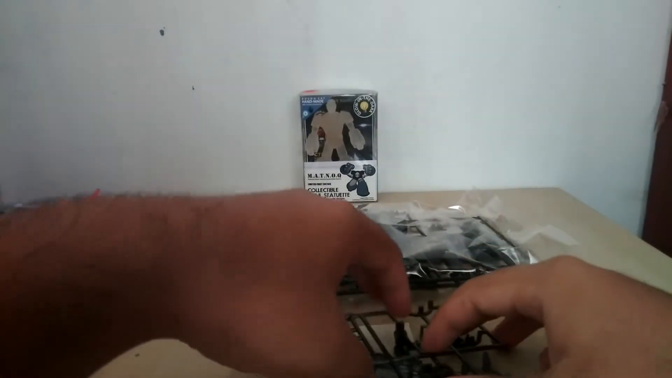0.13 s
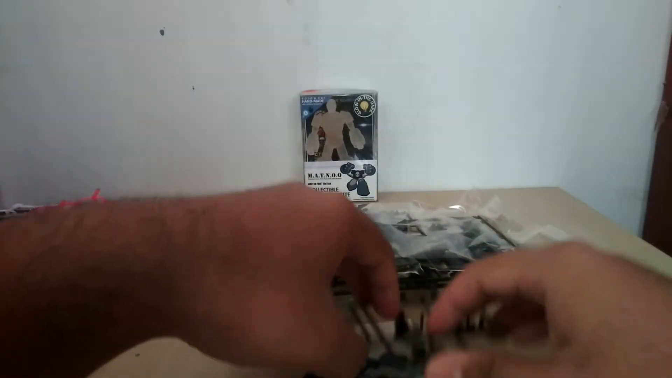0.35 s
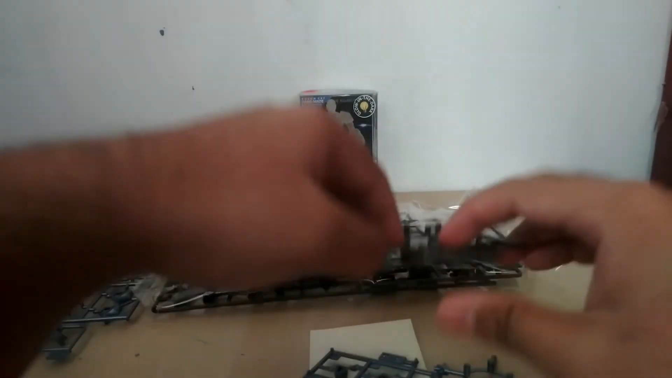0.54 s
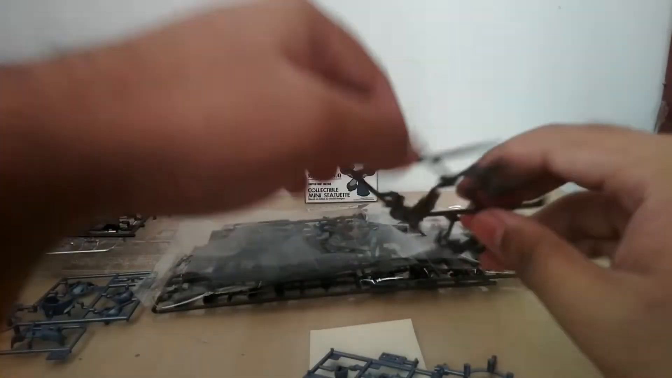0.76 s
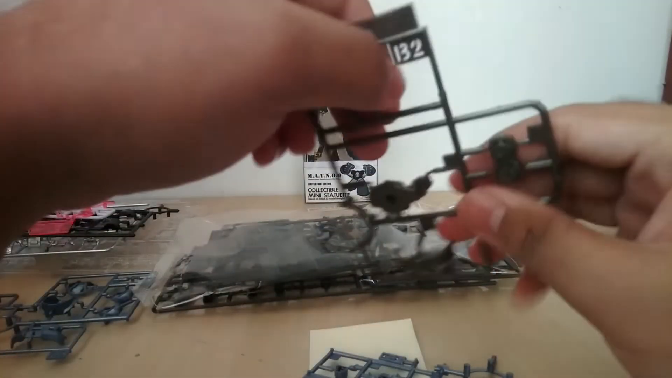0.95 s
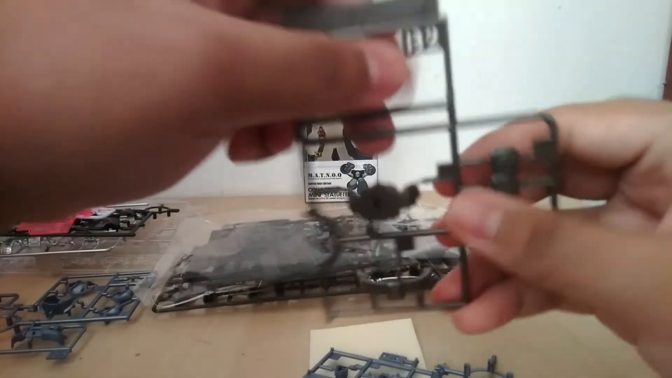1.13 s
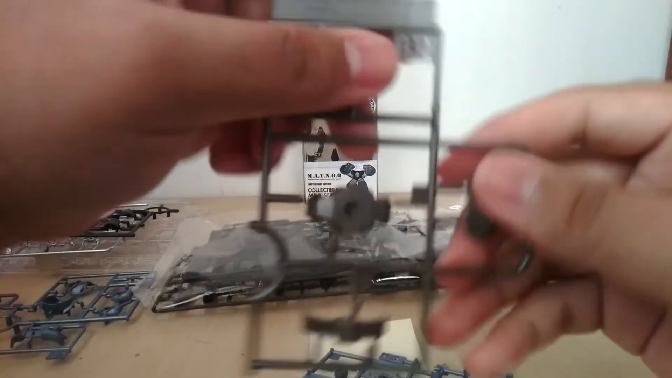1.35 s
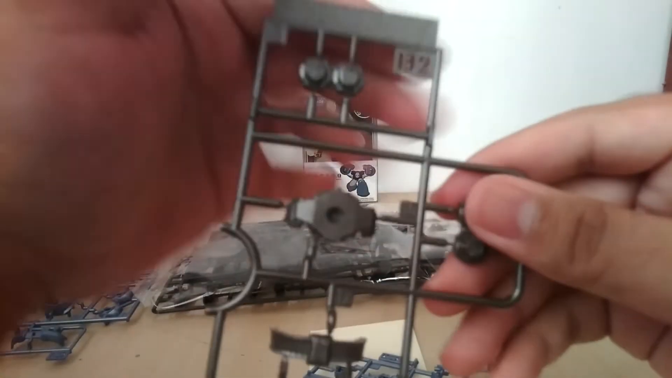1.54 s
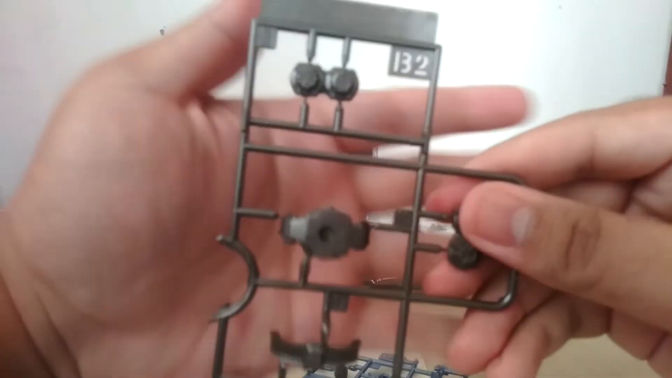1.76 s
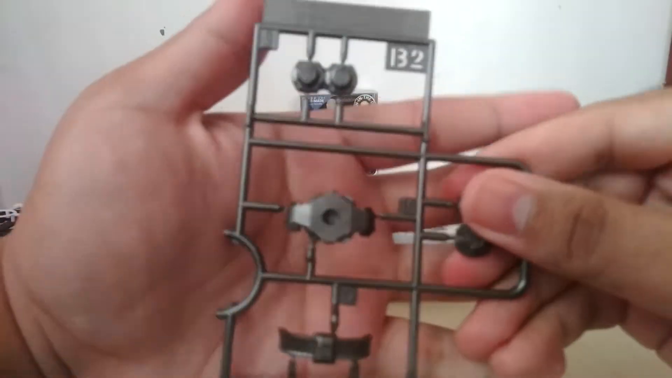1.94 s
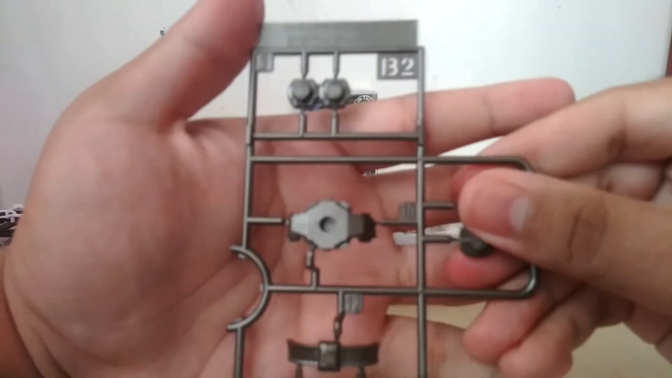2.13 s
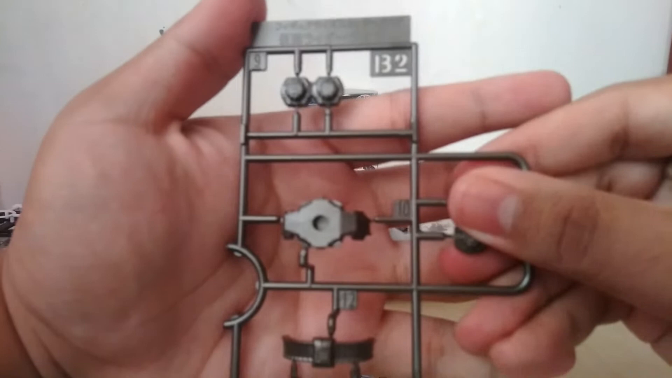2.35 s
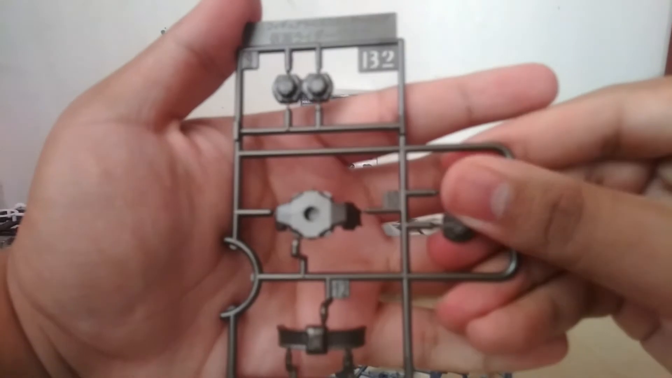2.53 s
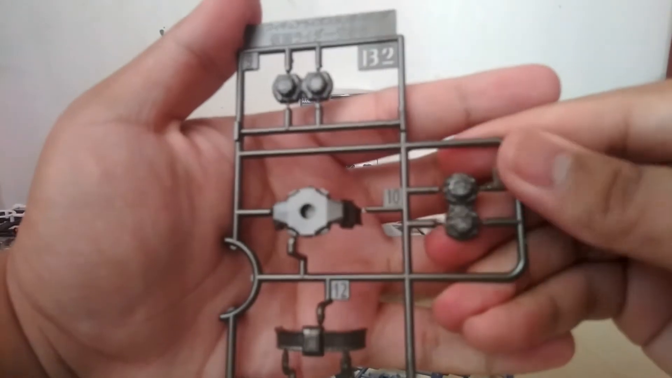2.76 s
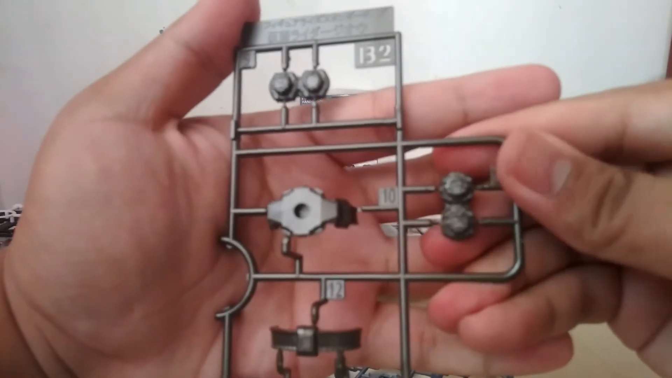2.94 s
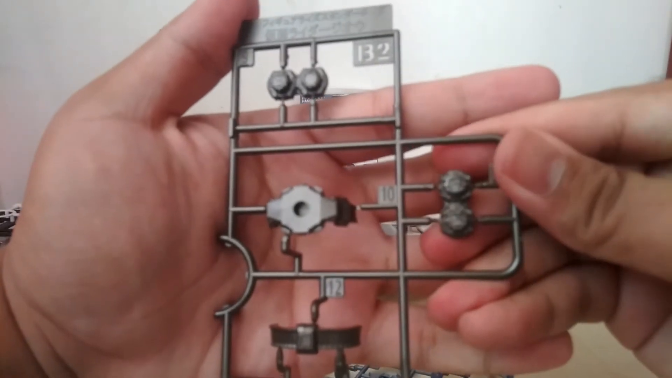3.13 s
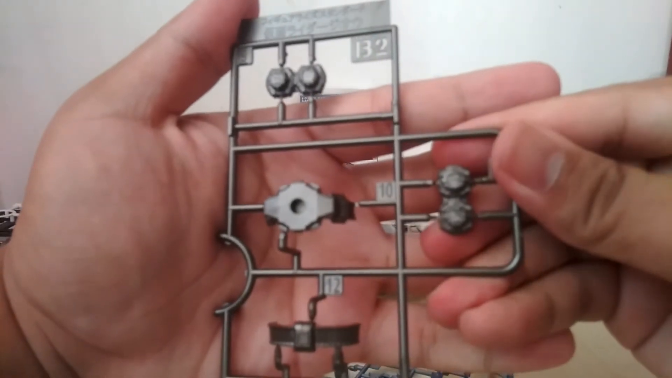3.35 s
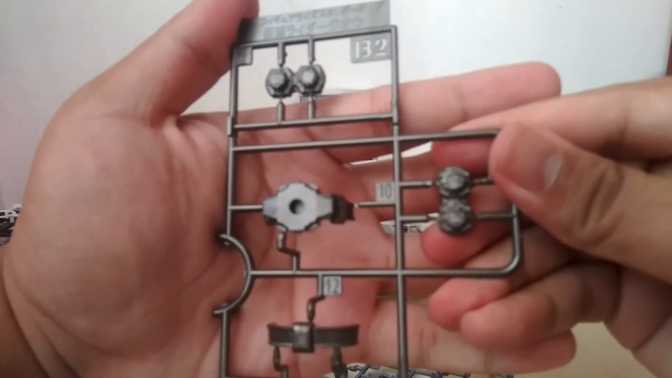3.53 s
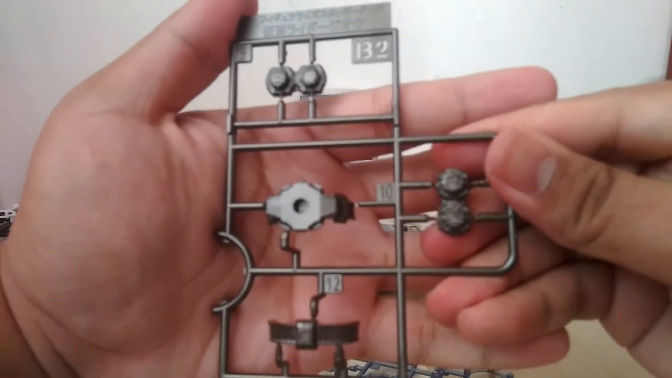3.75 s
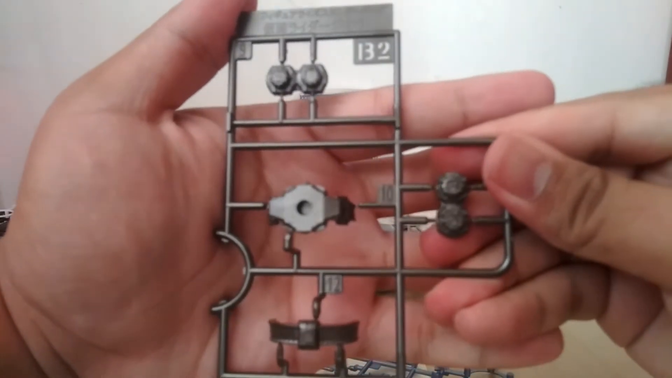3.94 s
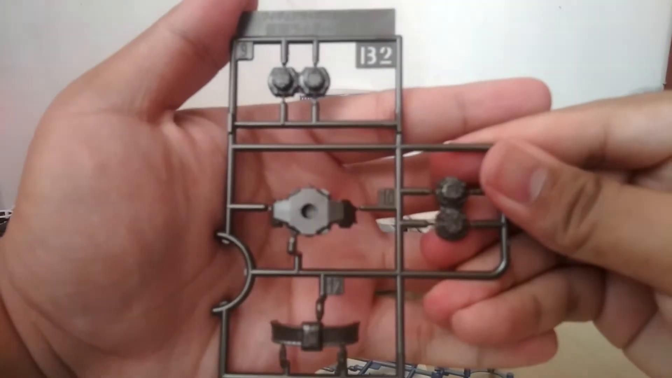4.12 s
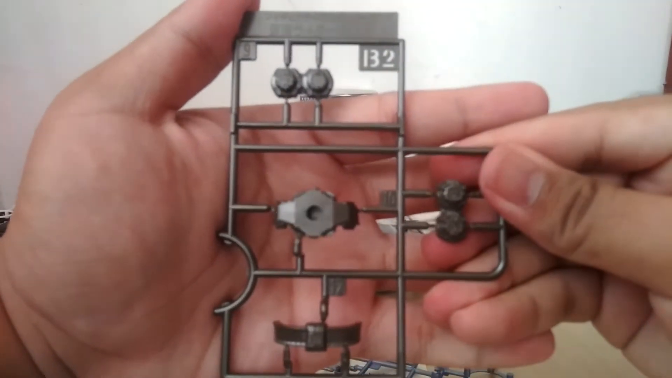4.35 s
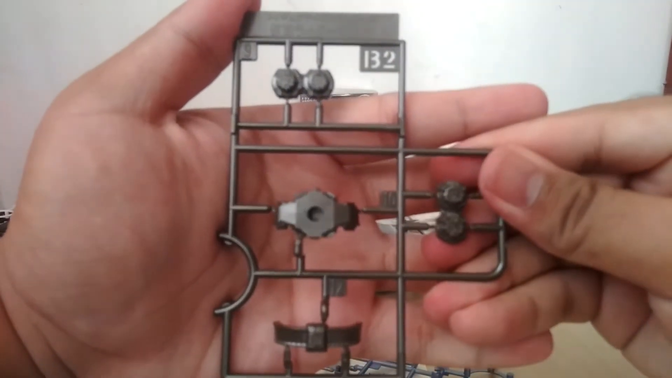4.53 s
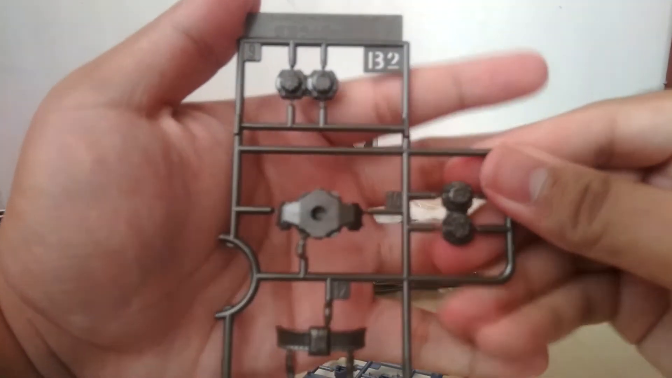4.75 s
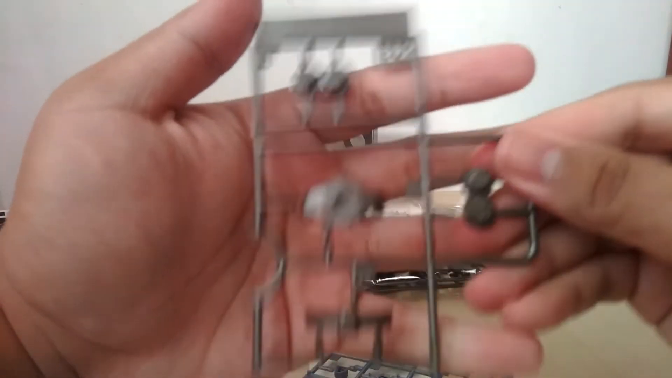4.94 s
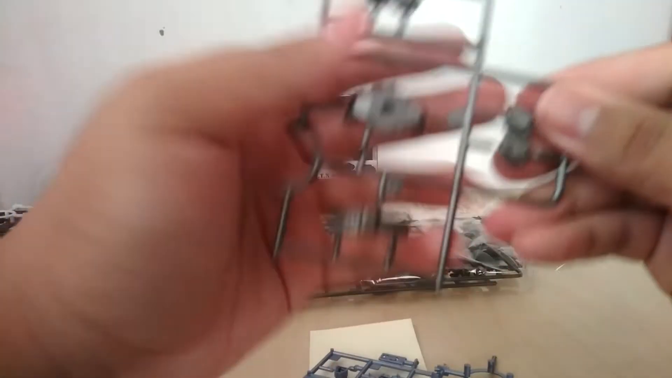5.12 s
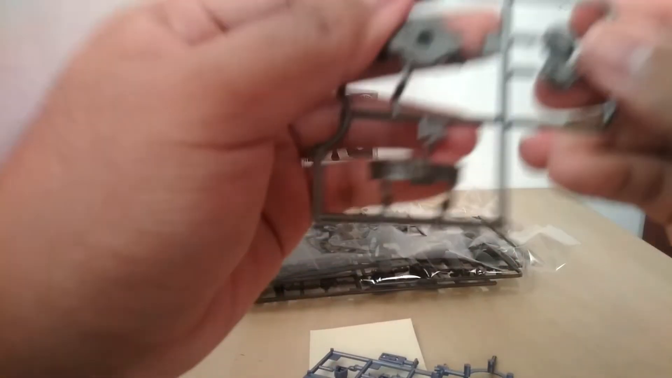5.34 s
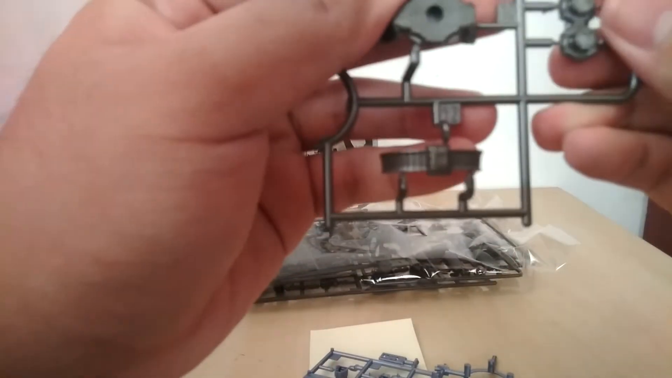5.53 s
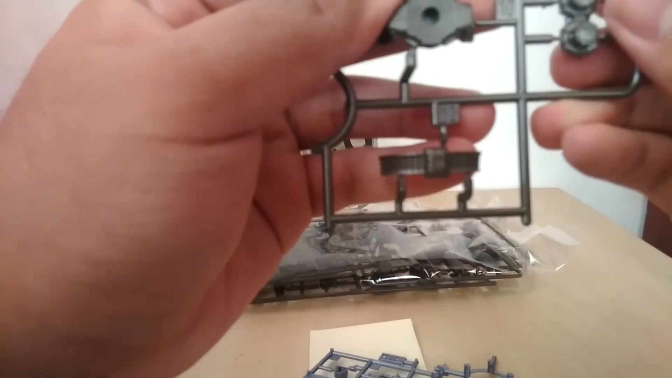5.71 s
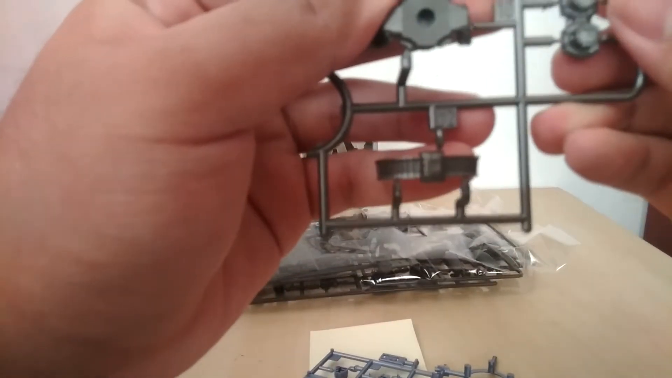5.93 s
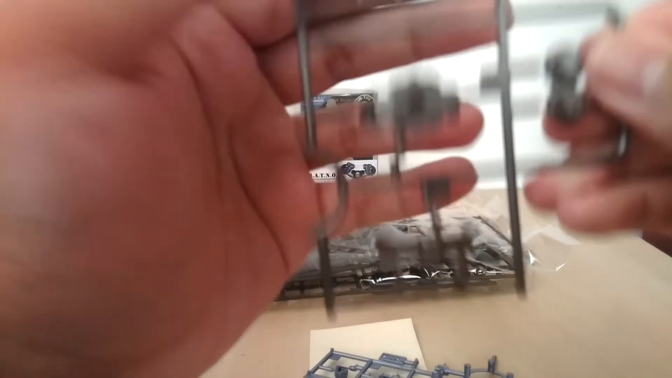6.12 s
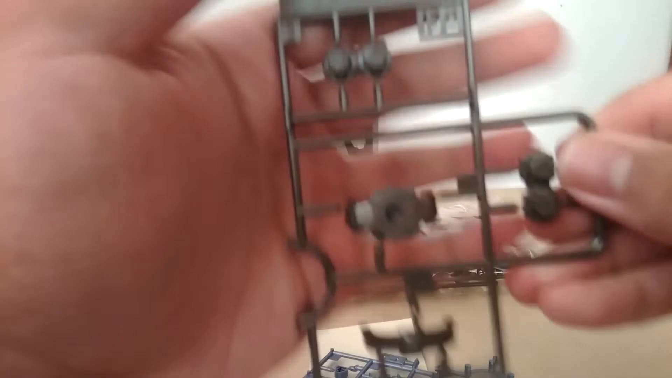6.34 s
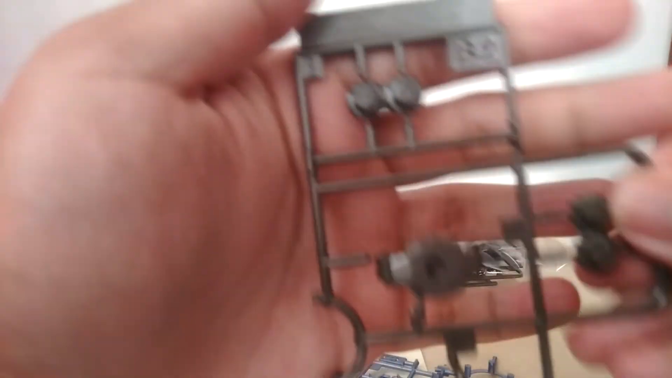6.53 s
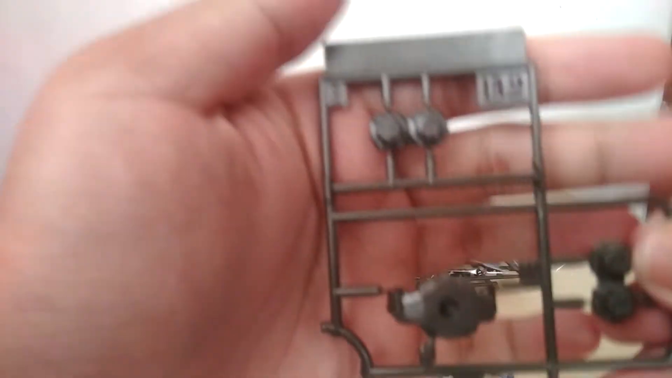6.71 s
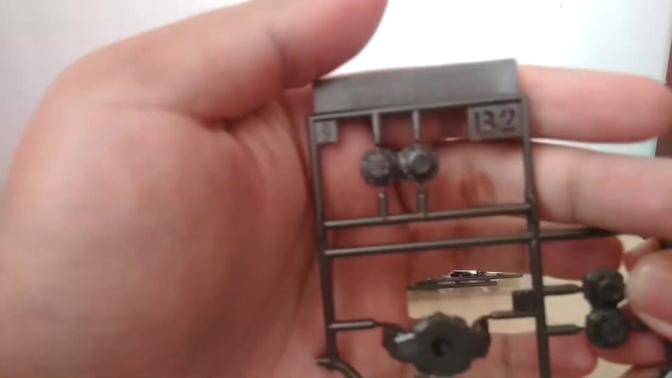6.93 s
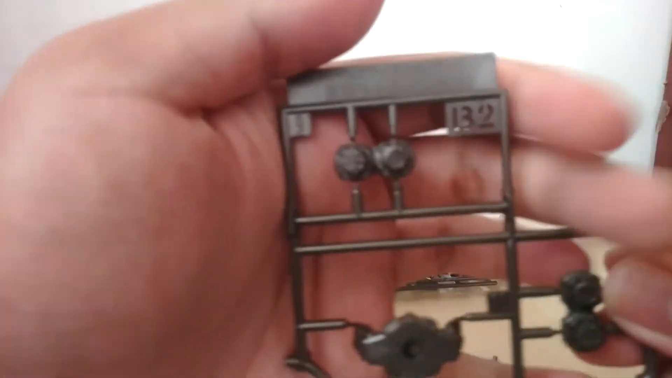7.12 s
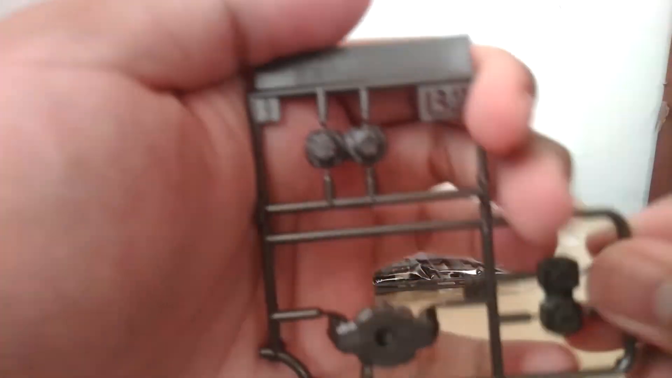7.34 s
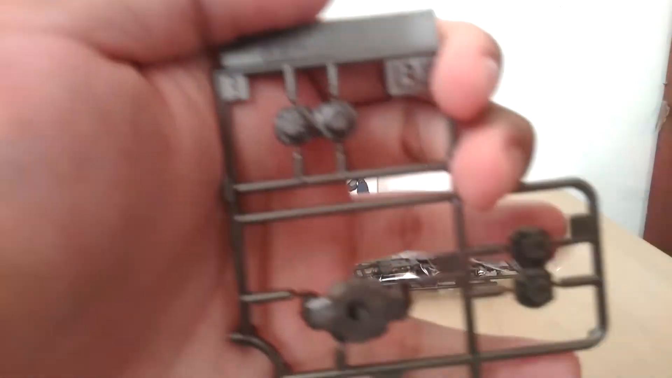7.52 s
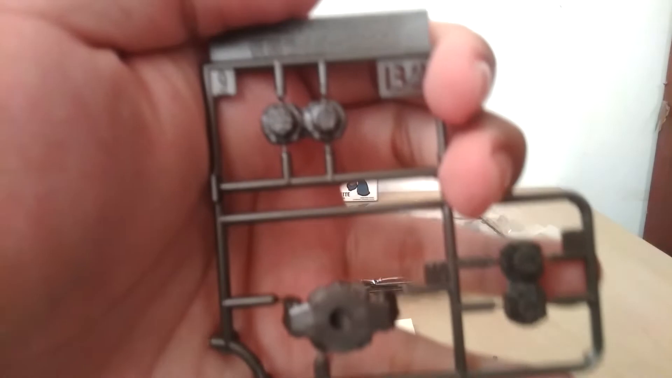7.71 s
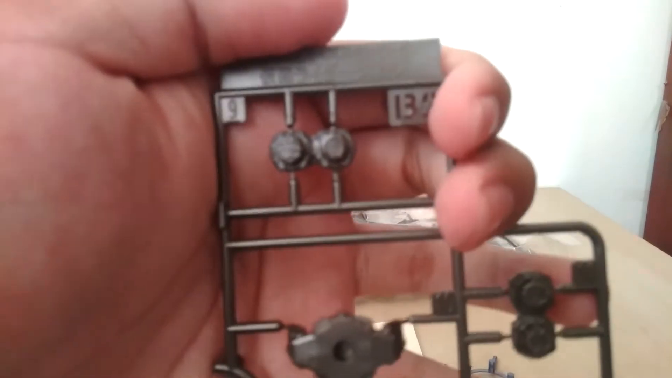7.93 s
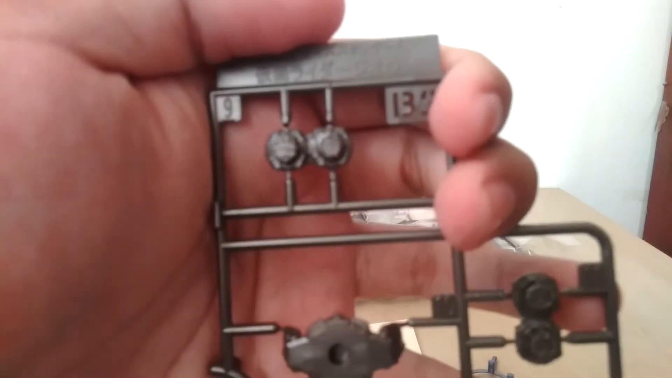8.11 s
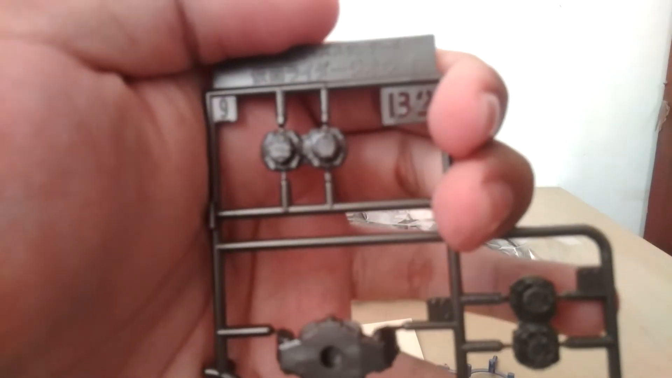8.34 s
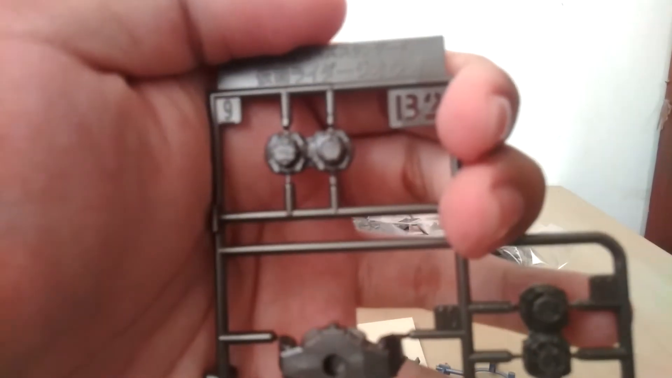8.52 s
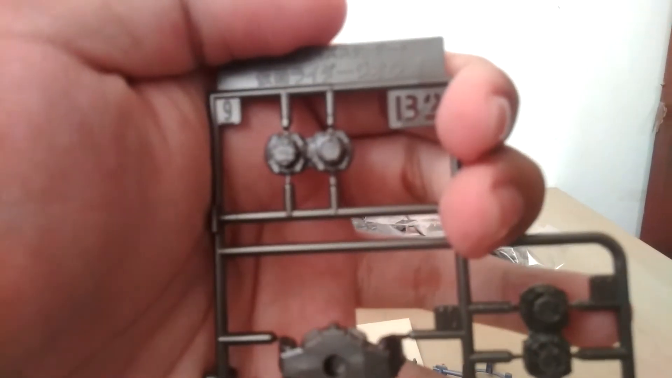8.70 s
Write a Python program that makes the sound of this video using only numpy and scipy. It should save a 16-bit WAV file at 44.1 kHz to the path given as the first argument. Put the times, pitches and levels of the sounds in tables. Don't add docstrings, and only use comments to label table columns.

```python
import sys
import numpy as np
from scipy import signal
from scipy.fft import rfft, irfft, next_fast_len
from scipy.io import wavfile
from scipy.ndimage import uniform_filter1d

SR = 44100
rng = np.random.default_rng(int(sys.argv[2]) if len(sys.argv) > 2 else 0)


def field_ratio(decibels):
    return 10 ** (np.asarray(decibels, dtype=float) / 20)


def put_to_file(sound):
    columns = np.atleast_2d(sound).T
    safe = np.clip(columns, -1, 1)
    whole_steps = np.round(safe * 32767)
    wavfile.write(sys.argv[1], SR, whole_steps.astype(np.int16))


N = 386757
PAD = next_fast_len(N)

# (time [s], bright peak [dB], favoured mode [Hz], body minus bright [dB])
CLACKS = [(.002, -39.5, 9580, -15), (0.013, -47.5, 8720, -7), (0.0523, -47.5, 10300, -12),
          (0.1456, -67, 10300, 8), (0.197, -44, 9400, -15), (0.2022, -56.5, 10900, 17.5),
          (.3385, -44, 10300, -12), (0.3421, -33, 12300, -25), (0.4787, -26, 7600, -10.5),
          (0.5405, -31, 6700, -9.5), (0.5793, -34, 6100, -13.5), (0.6028, -51, 6250, -5),
          (0.623, -49, 6180, -9), (.637, -56, 7050, -12), (.65, -59, 6180, -17), (0.8832, -68, 10700, 11),
          (1.1862, -42.5, 11300, -17.5)]
# (time [s], bright peak [dB], favoured mode [Hz])
TICKS = [(0.835, -58, 9840), (0.9017, -63, 13300), (0.924, -46, 8900), (1.0765, -41, 8600),
         (1.082, -44, 9660), (1.2566, -60, 9480), (1.265, -51, 11600), (1.3379, -50, 10450),
         (1.3542, -45.5, 10300), (1.365, -48, 10200), (1.7954, -49, 9400), (2.001, -55.5, 9750),
         (2.444, -69.5, 9850), (2.0977, -74, 10800), (2.7178, -63, 10200), (2.7532, -64, 9730),
         (4.73, -57.5, 9400), (4.847, -60, 8990), (4.856, -46.5, 11080), (4.881, -55, 12300),
         (5.0285, -49, 9400), (5.1479, -62, 9400), (5.2481, -60.5, 11230), (5.3799, -47.5, 10090),
         (5.4316, -57.5, 9600), (6.087, -74, 10120), (6.104, -61, 12000), (6.117, -50, 10440),
         (6.9858, -72, 10200), (6.9905, -65, 13120), (7.2182, -55, 11000), (7.307, -61, 9300),
         (7.313, -59, 13300), (7.319, -60, 9600), (7.42, -58.5, 9755), (7.4754, -66, 9890),
         (7.4879, -47.5, 11230), (7.501, -57, 10500), (7.8117, -61.5, 9560)]
# (frequency [Hz], width [Hz], level [dB])
FRAME_MODES = [(3280, 250, 0), (4070, 180, -27), (4350, 610, -1), (6100, 530, 8), (7270, 260, 1),
               (6950, 120, -1.5), (9300, 360, -8), (9400, 400, 5.5), (10300, 400, 7.5), (11300, 640, 7.5),
               (13300, 530, 7)]
# (time [s], peak [dB])
KNOCKS = [(.003, -43.5), (.053, -54), (0.146, -49), (.157, -48), (.197, -40), (0.202, -34), (.206, -42),
          (0.228, -47.5), (.341, -46), (.479, -44), (.541, -50), (0.579, -55)]
# (frequency [Hz], level [dB], t60 [s])
TABLE_MODES = [(173, -2, 0.2), (375, -3, 0.07), (435, -3.5, 0.1), (928, 4, 0.039), (1380, -3, 0.041),
               (1770, 6, 0.04), (2870, 3, .025), (3300, 1, .02)]
# (peak time [s], fine rub [dB], scrape [dB], rise [s/10 dB], fall [s/10 dB])
SCRAPES = [
    (0.001, -54, -49, 0.0092, 0.017),
    (0.059, -61, -66.5, 0.062, 0.072),
    (0.152, -56, -56.5, 0.0054, 0.068),
    (.25, -81, -60, 0.05, 0.048),
    (.31, -60.5, -87, 0.032, 0.2),
    (0.408, -57.5, -64.5, 0.18, 0.01),
    (.51, -64, -55.5, 0.019, 0.11),
    (.65, -73, -67, 0.12, 0.011),
]
# (frequency [Hz], density [dB/Hz])
SCRAPE_SPECTRUM = [(410, -47), (700, 2.5), (1320, -76), (1770, -2.5), (2080, -12), (3920, -1.5),
                   (5710, -5.5), (6080, -5), (8000, -14), (10400, -39), (17600, -120)]
# (peak time [s], level [dB], rise [s/10 dB], fall [s/10 dB], singing region [Hz])
SLIDES = [(.7, -66, 0.053, 0.12, 9400), (.85, -63, 0.015, 0.046, 10010), (.915, -57.5, .03, 0.023, 12500),
          (1.02, -61, 0.074, .07, 11400), (1.08, -60, .006, 0.026, 9200), (1.2, -60.5, .01, .06, 11500),
          (1.27, -58, .03, .03, 10500), (1.355, -51.5, 0.038, 0.017, 10300), (1.42, -68, .08, 0.32, 9900),
          (1.82, -67, .02, 0.071, 9530), (2.16, -65.5, 0.097, .073, 10000),
          (2.77, -58.5, 0.035, 0.082, 10300), (4.74, -70.5, .02, 0.52, 10200),
          (4.875, -61, .02, 0.046, 11500), (5.05, -69.5, .03, .2, 9300), (5.21, -65.5, 0.053, .12, 11300),
          (5.37, -63.5, 0.066, 0.11, 10300), (6.13, -66, 0.017, .08, 10580), (6.35, -69, 0.14, 0.11, 9800),
          (6.51, -61.5, 0.11, 0.061, 10400), (6.66, -69, 0.095, 0.14, 10000),
          (7.0, -66, 0.023, 0.041, 11500), (7.07, -70.5, .04, 0.12, 9910), (7.24, -67, 0.019, 0.072, 9490),
          (7.315, -58, .015, 0.019, 11700), (7.5, -70, 0.21, .2, 10000), (8.23, -69.5, 0.078, 0.17, 9900),
          (8.77, -79, 0.33, .093, 10010)]
# (frequency [Hz], density [dB/Hz])
SKIN_SPECTRUM = [(4500, -22), (6300, -12), (7600, -14.5), (9000, -11), (10500, -10.5), (12100, -13),
                 (13800, -14), (15000, -10)]
# (time [s], pitch [Hz], level [dB])
SQUEAKS = [
    [(2.59, 11120, -100), (2.63, 12800, -78), (2.68, 13100, -85), (2.77, 12210, -84), (2.79, 12000, -100)],
    [(6.57, 11300, -100), (6.6, 11400, -75), (6.65, 11500, -76), (6.67, 11500, -100)],
]
# (frequency [Hz], left minus right [dB])
PORTS = [(1500, -6.5), (3000, -4), (5000, -0.5), (6500, 2.5), (8000, -21), (11000, -27), (15000, -16)]
# (time [s], engine load [dB], tyre nearness [dB])
ROAD = [(0.0, -53, -70), (0.34, -54.5, -62.5), (0.85, -60, -79.5), (1.39, -69, -82.5), (2.42, -63, -82.5),
        (2.55, -54, -76.5), (2.86, -64, -79.5), (3.74, -52, -77), (4.52, -58.5, -76.5), (5.01, -52, -75.5),
        (6.13, -56.5, -75.5), (6.34, -43.5, -72), (6.58, -51.5, -72.5), (7.2, -51, -73.5),
        (7.77, -49, -68.5), (8.15, -51, -69), (8.45, -52.5, -65), (8.62, -50, -66.5), (8.77, -47, -65.5)]
# (peak time [s], level [dB], rise [s/10 dB], pitch [Hz])
SURGES = [(.05, -41, 0.13, 56.36), (.35, -38, 0.23, 56), (.66, -35.5, -0.05, 57.1), (.98, -49, -0.19, 53.7),
          (1.21, -58.5, -0.7, 56.9), (1.34, -56.5, -0.12, 57.4), (1.728, -59, 0.32, 60.6),
          (2.0, -61, 0.76, 57.9), (2.25, -55.5, 0.04, 55.6), (2.54, -41, 0.02, 56.2),
          (2.66, -56.5, 0.48, 53.9), (2.82, -56.5, -0.18, 55.04), (3.05, -60.5, 0.4, 57.25),
          (3.25, -43, 0.01, 58), (3.44, -44, 0.11, 59.03), (3.73, -44.5, 0.2, 58.93), (3.92, -55, 0.45, 60),
          (4.04, -41, -0.05, 60.7), (4.36, -39, 0.06, 61.35), (4.55, -48, 0.36, 61),
          (4.759, -43, 0.11, 63.97), (5.061, -38.5, 0.04, 61.3), (5.3, -51, 0.3, 58),
          (5.43, -46, 0.06, 55.9), (5.62, -54, 0.84, 56.2), (5.8, -52.5, 0.1, 56.96),
          (6.0, -62, -0.2, 57.4), (6.19, -44, 0.07, 58.1), (6.35, -48, -0.33, 58.65),
          (6.55, -42.5, .04, 65.1), (6.789, -33.5, 0.02, 57.65), (6.98, -42, 0.14, 56.64),
          (7.1, -50, 0.1, 65), (7.23, -47.5, 0, 59.5), (7.4, -46.5, 0.12, 57.9), (7.58, -49, -0.65, 57.8),
          (7.72, -43, 0.16, 56.53), (7.82, -45, -0.36, 62.3), (8.04, -49, -0.03, 66.4),
          (8.25, -49, 0.22, 61.8), (8.38, -48.5, 0.02, 62.24), (8.6, -34.5, -0.14, 52.64),
          (8.7, -36.5, 0.03, 52.8)]
# (peak time [s], level [dB], rise [s/10 dB], fall [s/10 dB], frequency [Hz])
OVERTONES = [(8.56, -57.5, 0.0838, 0.15, 166), (8.61, -61, 0.043, 0.043, 340), (8.7, -63, 0.072, .1, 445),
             (5.98, -66, 0.27, .35, 236), (6.25, -65.5, .15, 0.094, 340), (7.45, -61, 0.09, 0.1, 178),
             (7.75, -61, 0.082, .2, 172), (6.5, -57.5, 0.052, .06, 175), (0.027, -58, .1, 0.14, 163),
             (0.085, -65, .2, 0.35, 405), (0.752, -69, .3, .12, 340), (0.706, -65, .2, 0.14, 170),
             (4.05, -65, .15, 0.14, 170), (2.95, -68.5, 0.086, .08, 172)]
# (frequency [Hz], density [dB/Hz])
ROOM_SPECTRUM = [(28, -33), (40, -6), (52, -1.5), (68, -2), (84, 5), (98, -5.5), (113, -9.5), (135, -15.5),
                 (155, -19), (172, -12), (195, -29), (240, -66.5)]
# (frequency [Hz], density [dB/Hz])
ROAR_SPECTRUM = [(120, -42), (200, 1), (237, 4), (290, 0), (338, 3.5), (390, -2.5), (446, -1), (500, -5),
                 (600, -12.5), (800, -49)]
# (peak time [s], level [dB], rise [s/10 dB], fall [s/10 dB])
GEAR = (6.5, -60.5, -0.17, -0.08)
# (peak time [s], level [dB], rise [s/10 dB], fall [s/10 dB])
LORRY = (8.5, -60, 0.05, 1)
# (frequency [Hz], density [dB/Hz])
TYRE_SPECTRUM = [(450, -17), (750, 1), (850, -2), (980, -0.5), (1070, -6.5), (1170, -5), (1500, -7),
                 (2050, -9), (2600, -10.5), (4000, -16), (6000, -20.5)]
# (time [s], level [dB])
TREAD = [(6.7, -88), (7.05, -73.5), (7.6, -73), (8.1, -71), (8.77, -69.5)]
# (frequency [Hz], density [dB/Hz])
TREAD_SPECTRUM = [(800, -23), (960, 4.5), (1050, -7), (1150, 2.5), (1350, -9.5), (1500, -35.0)]
# (time [s], level [dB])
BRAKE = [(8.33, -100), (8.4, -65.5), (8.5, -81), (8.58, -81), (8.63, -63.5), (8.7, -60.5), (8.77, -65)]
# (frequency [Hz], density [dB/Hz])
BRAKE_SPECTRUM = [(1400, -10), (2050, 18.0), (2600, 1.0), (3300, 12.5), (4000, 19.5), (4700, 10.0), (5600, -8.0)]
# (time [s], firing rate [Hz])
FIRING_RATE = [(2.6, 29.2), (3.5, 29.6), (4.1, 30.2), (4.9, 30.9), (5.3, 31.0), (5.55, 28.4), (6.0, 29.6),
               (6.4, 30.4)]
# (time [s], level [dB])
ENGINE_LEVEL = [(2.6, -83), (3.3, -85.5), (4.4, -74), (5.3, -76), (5.9, -70.5), (6.25, -72.5), (6.4, -82)]
# (frequency [Hz], density [dB/Hz])
ENGINE_SPECTRUM = [(90, -40), (150, -7.0), (240, 11.0), (370, 8.0), (460, -20.0), (700, -60)]
# (first note [s], last note [s], low band at first note [dB], at last note [dB],
# upper band at its height [dB])
CHATTER = [(1.344, 1.983, -92, -77.5, -74.5), (2.358, 2.772, -78, -68.5, -79),
           (2.997, 3.405, -79, -89, -67.5), (3.523, 3.53, -81.5, -80, -97), (4.127, 4.775, -104, -71, -69),
           (5.193, 5.811, -82, -78.5, -69), (6.002, 6.121, -82, -79, -73), (6.413, 6.49, -97, -80, -74),
           (6.772, 6.77, -93, -90, -70), (6.87, 7.531, -101, -74.5, -69.5), (7.74, 7.943, -97, -76, -66.5),
           (8.073, 8.293, -75, -65, -70)]
# (frequency [Hz], width [Hz])
THROAT = [
    (2640, 400),
    (2900, 440),
    (3700, 340),
    (3450, 400),
]
# (start [s], length [s], first pitch [Hz], last pitch [Hz], level [dB])
FALLS = [(1.03, .12, 6200, 3010, -55.5), (1.518, .085, 6400, 4400, -59), (1.975, .085, 6290, 4260, -58),
         (2.436, .11, 6400, 3360, -57), (3.258, .12, 5900, 3672, -56.5), (4.191, .13, 6340, 3570, -55.5),
         (4.77, .12, 6300, 3460, -54.5), (5.332, 0.086, 6300, 4090, -55.5),
         (5.825, .085, 6430, 3920, -53.5), (6.321, .1, 6470, 3670, -54), (6.881, 0.098, 6400, 3505, -52),
         (7.761, 0.088, 6370, 4020, -55), (8.341, .087, 6300, 4350, -59)]
# (start [s], length [s], first pitch [Hz], last pitch [Hz], level [dB])
RISES = [
    (2.89, 0.098, 3750, 4290, -65),
    (3.136, 0.096, 1132, 1290, -67.5),
    (3.201, 0.43, 1290, 1302, -78.5),
    (3.798, 0.12, 3756, 4404, -59),
    (4.72, 0.3, 1000, 1376, -75.5),
    (6.269, 0.11, 743, 747, -73),
    (6.272, 0.0974, 1192, 1264, -70),
    (6.588, 0.055, 4570, 4843, -64),
    (7.407, 0.091, 3790, 4430, -63),
    (8.303, 0.11, 236, 257.7, -52.5),
]
# (frequency [Hz], density [dB/Hz])
HISS_SPECTRUM = [(880, -64), (1500, -14.5), (3640, -9.5), (4810, -14), (6000, -11.5), (7210, -13),
                 (8580, -12.5), (10800, -12), (13800, -16.5), (15000, -46)]


def curve(table, column=-1):
    rows = np.array(table)
    return np.interp(np.arange(N) / SR, rows[:, 0], rows[:, column], -140, -140)


def on_bins(points):
    rows = np.array(points)
    bins_hz = np.arange(PAD // 2 + 1) * SR / PAD
    return np.interp(np.log(bins_hz + 1), np.log(rows[:, 0]), rows[:, 1])


def coloured(points, x=None):
    source = rng.standard_normal(N) if x is None else x
    y = irfft(rfft(source, PAD) * field_ratio(on_bins(points)), PAD)[..., :N]
    return y / np.std(y)


def wide(points, side_db):
    return coloured(points) + field_ratio(side_db) * coloured(points) * np.array([[1], [-1]])


def walk(rate_hz):
    k = int(SR / rate_hz)
    steps = np.repeat(rng.standard_normal(N // k + 1), k)
    return 1.277 * uniform_filter1d(uniform_filter1d(steps, k), k)[:N]


def swells(rows, weight=1):
    t = np.arange(0, N, 80) / SR
    s, db, rise, fall = np.array(rows).T[:, :, None]
    away = np.maximum((s - t) / np.abs(rise), (t - s) / np.abs(fall))
    power = field_ratio(2 * db - 20 * away)
    return np.interp(np.arange(N) / SR, t, (weight * power).sum(axis=0)) + 1e-30


def tone(hz, db, waver_hz, waver_db):
    hz = np.maximum(hz, 0) + waver_hz * walk(12)
    level = np.sqrt(2) * field_ratio(db + waver_db * walk(19))
    return level * np.sin(2 * np.pi * np.cumsum(hz) / SR)


def band(x, hz, width_hz):
    edges_hz = [hz - width_hz / 2, hz + width_hz / 2]
    return signal.sosfilt(signal.butter(2, edges_hz, "band", fs=SR, output="sos"), x)


def high_pass(x, order, edge_hz):
    return signal.sosfilt(signal.butter(order, edge_hz, "high", fs=SR, output="sos"), x)


def echoes(x, t60):
    t = np.arange(SR // 2) / SR
    tail = rng.standard_normal((2, len(t))) * field_ratio(-60 * t / t60) * np.minimum(t / .001, 1)
    return signal.fftconvolve(x[None], tail / np.linalg.norm(tail[0]), axes=1)[:, :N]


def add(out, s, sound):
    i = max(int(s * SR), 0)
    out[i:i + len(sound)] += sound[:len(out) - i]


def frame_ticks():
    out, t = np.zeros(N), np.arange(1500) / SR
    hz, width_hz, db = np.array(FRAME_MODES).T[:, :, None]
    bright = hz[:, 0] > 5800
    held_body_db = -30
    hits = [(*clack, False) for clack in CLACKS] + [(*tick, held_body_db, True) for tick in TICKS]
    for s, peak_db, struck_hz, body_db, held in hits:
        impacts = rng.standard_normal(300)
        if held:
            blow = impacts ** 3 * np.exp(-t[:300] / .002)
        else:
            blow = impacts * np.abs(impacts) * np.exp(-t[:300] / .0035)
        octaves_off = np.abs(np.log2(hz / struck_hz)) * bright[:, None]
        gain_db = db + 4 * rng.standard_normal((len(hz), 1)) - 15 * octaves_off
        rings = field_ratio(gain_db) * np.exp(-np.pi * 2 * width_hz * t) * np.sin(2 * np.pi * hz * t)
        rings[:, 0] = field_ratio(gain_db[:, 0])
        bright_edge_hz = 7600 if held else 5900
        for group, edge_hz, level_db in ((bright, bright_edge_hz, peak_db), (~bright, 1500, peak_db + body_db)):
            sound = high_pass(np.convolve(blow, rings[group].sum(axis=0)), 4, edge_hz)
            add(out, s, sound / np.abs(sound).max() * field_ratio(level_db + 8.0))
    return out


def knocks():
    out, t = np.zeros(N), np.arange(6000) / SR
    modes = sum(field_ratio(db - 60 * t / t60) * np.sin(2 * np.pi * hz * t) for hz, db, t60 in TABLE_MODES)
    ring = modes * np.minimum(t / 0.0019, 1)
    for s, db in KNOCKS:
        add(out, s, field_ratio(db) * ring / np.abs(ring).max())
    return out


def rubbing():
    crackle_db = np.array([2, 5]).reshape(2, 1, 1)
    size_db = np.minimum(crackle_db * rng.exponential(size=(2, 2, N)), 24)
    skin_grains, table_grains = rng.standard_normal((2, 2, N)) * field_ratio(size_db)
    slip_rows = [(s, db - 19, 0.0034, 0.08) for s, db, hz in TICKS]
    slips = swells(slip_rows + [(s, db, rise, fall) for s, db, _, rise, fall in SCRAPES])
    coarse = np.sqrt(swells([(s, db, rise, fall) for s, _, db, rise, fall in SCRAPES]))
    fine, slides, skin = coloured(SKIN_SPECTRUM, skin_grains), np.array(SLIDES), 0
    for k, hz in enumerate(range(4600, 14600, 700)):
        octaves_off = np.abs(np.log2(hz / slides[:, -1:]))
        favour = field_ratio(4 - 10.5 * octaves_off) ** 2
        level = np.sqrt(slips + swells(slides[:, :-1], favour)) * field_ratio(2.6 * walk(16))
        skin = skin + (-1) ** k * band(fine, hz, 600) * level
    skin = skin * field_ratio(-.6 + 1.5 * walk(120))
    table = coloured(SCRAPE_SPECTRUM, table_grains) * coarse * field_ratio(3.5 * walk(110))
    squeaks = sum(tone(curve(row, column=1), curve(row), waver_hz=60.0, waver_db=5.0) for row in SQUEAKS)
    return skin + table + squeaks


def engine_notes():
    power = swells([(s, db, rise, 1.16 * rise) for s, db, rise, hz in SURGES])
    weighted = swells([(s, db, rise, 1.16 * rise) for s, db, rise, hz in SURGES], weight=np.array(SURGES)[:, -1:])
    pitch_hz = weighted / power
    boom = tone(pitch_hz, 10 * np.log10(power), waver_hz=1.0, waver_db=1.5)
    rumble = field_ratio(curve(ROAD, column=1) + 2.5 + 2.27 * walk(7)) * wide(ROOM_SPECTRUM, side_db=-22.5)
    overtones = sum(tone(hz, 10 * np.log10(swells([swell])), waver_hz=3.93, waver_db=4.0)
                    for *swell, hz in OVERTONES)
    return boom + rumble + overtones


def slow_engine():
    rate_hz = np.maximum(curve(FIRING_RATE), 1) * (1 + .003 * walk(8))
    turns = np.cumsum(rate_hz) / SR
    firings = np.diff(np.floor(turns), prepend=0) * field_ratio(1.5 * rng.standard_normal(N))
    return field_ratio(curve(ENGINE_LEVEL)) * coloured(ENGINE_SPECTRUM, firings)


def exhaust_roar():
    load_db, near_db = curve(ROAD, column=1), curve(ROAD)
    passing = field_ratio(near_db + 0.27 * (load_db - near_db) - 2)
    level = passing + field_ratio(curve(ENGINE_LEVEL) + 1.5) + np.sqrt(swells([LORRY, GEAR]))
    return level * field_ratio(1.5 * walk(9) + .8 * walk(3)) * wide(ROAR_SPECTRUM, side_db=-11.0)


def tyres():
    rolling = field_ratio(curve(ROAD) + walk(8)) * wide(TYRE_SPECTRUM, side_db=-3.0)
    return rolling + field_ratio(curve(TREAD) + walk(3.0)) * wide(TREAD_SPECTRUM, side_db=-0.5)


def traffic():
    brake = field_ratio(curve(BRAKE)) * wide(BRAKE_SPECTRUM, side_db=-2.0)
    return engine_notes() + slow_engine() + exhaust_roar() + tyres() + brake


def chatter():
    phase = np.cumsum(92 * (1 + 0.11 * walk(60))) / SR % 1
    rasp = rng.standard_normal(N) * (1.0 + np.exp(-phase / 0.6))
    breath = 0.64 * band(rasp, 3324, 1430)
    voices = np.array([band(rasp, hz, width_hz) + breath for hz, width_hz in THROAT])
    t = np.arange(-2200, 2200) / SR
    swell, gains = np.exp(-(t / 0.026) ** 2), np.zeros((len(THROAT), N))
    note_gap_s, slowing, upper_height, upper_arch_db, scatter_db = .105, 0.023, 0.44, -16, 1
    for first, last, first_db, last_db, upper_db in CHATTER:
        for u in np.linspace(0, 1, round((last - first) / note_gap_s) + 1):
            s = first + (last - first) * (u - 4 * slowing * u * (1 - u)) + t[0] - .008
            scatter = rng.standard_normal(3)
            closed = np.pi / 2 * np.clip(u + .25 * scatter[2], 0, 1)
            low = field_ratio(4.5 + first_db + (last_db - first_db) * u + scatter_db * scatter[0])
            high = field_ratio(3.5 + upper_db + upper_arch_db * (u - upper_height) ** 2 + scatter_db * scatter[1])
            mouth = np.array([np.cos(closed), np.sin(closed)])
            for gain, size in zip(gains, (*(low * mouth), *(high * mouth))):
                add(gain, s, swell * size)
    return (gains * voices / voices.std(axis=1, keepdims=True)).sum(axis=0)


def whistles():
    out = np.zeros(N)
    flutter_hz, waver = 170 * (1 + 0.255 * walk(50)), walk(700)
    calls = [(*fall, 0.52) for fall in FALLS] + [(*rise, 0.71) for rise in RISES]
    for s, length, first_hz, last_hz, db, buzz in calls:
        p = np.arange(int(length * SR)) / (length * SR)
        falling = last_hz < first_hz
        bend = 1.5 if falling else 4.0
        near = slice(int(s * SR), int(s * SR) + len(p))
        glide_hz = last_hz + (first_hz - last_hz) * (1 - p) ** bend
        hz = glide_hz * (1 + .03 * buzz * waver[near])
        chop = 1 + buzz * np.sin(2 * np.pi * np.cumsum(flutter_hz[near]) / SR)
        if falling:
            chop = chop * field_ratio(3.5 - 15 * np.abs(np.log2(hz / 4800)))
        swell = np.sin(np.pi * p ** 0.75) ** 0.7
        add(out, s, field_ratio(db) * swell * chop * np.sin(2 * np.pi * np.cumsum(hz) / SR))
    return out


def microphone_hiss():
    spectrum = [(300, -3.0), (800, -2.5)] + HISS_SPECTRUM
    ports = np.array([field_ratio(walk(11)) * coloured(spectrum) for _ in range(2)])
    return field_ratio(-75.5 + 0.79 * walk(3.23)) * ports


def scene():
    ticks = frame_ticks() + knocks()
    rub, other = rubbing()
    hands = field_ratio(-.3) * ticks + field_ratio(-8) * echoes(ticks, t60=.025) + field_ratio(-12) * echoes(ticks, t60=.16)
    hands += np.array([(rub + other) / np.sqrt(2), rub])
    left = field_ratio(on_bins(PORTS))
    port_gains = np.array([2 * left, 2 + 0 * left]) / (1 + left)
    near = irfft(rfft(hands, PAD) * port_gains, PAD)[:, :N] * field_ratio(-0.5)
    notes, song = field_ratio(-1.0) * chatter(), whistles()
    birds = notes + field_ratio(-4) * song + echoes(field_ratio(-2) * notes + field_ratio(-6) * song, t60=.28)
    far = traffic() * field_ratio([[-.8], [.8]]) + birds * field_ratio([[.4], [-.4]])
    lag = 5
    return np.array([np.roll(near[0], lag // 2) + np.roll(far[0], lag), near[1] + far[1]])


def low_pass(x):
    return signal.sosfilt(signal.butter(12, 15590, fs=SR, output="sos"), x)


def record(dry):
    cut = high_pass(dry + microphone_hiss(), 2, 36)
    mix = signal.sosfilt(signal.ellip(10, .3, 45, 14300, fs=SR, output="sos"), cut)
    return low_pass(mix)


dry = scene()
out = record(dry)
put_to_file(out)
```